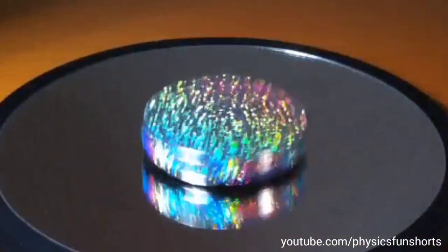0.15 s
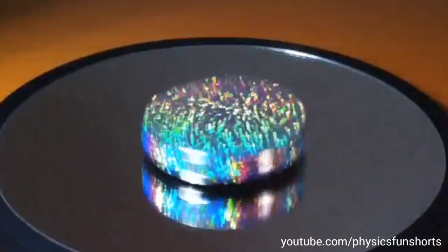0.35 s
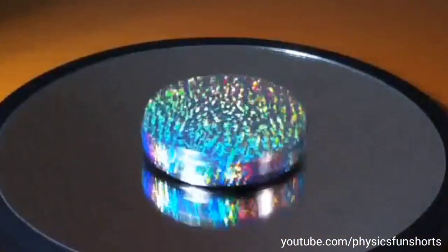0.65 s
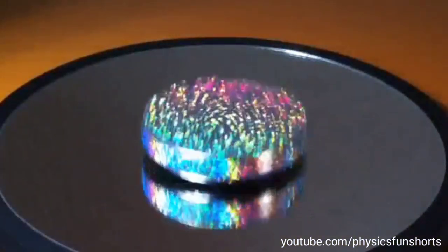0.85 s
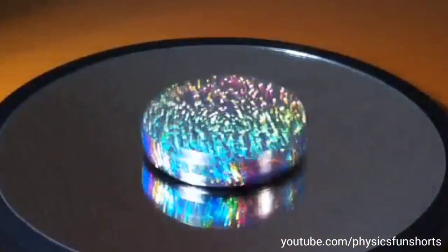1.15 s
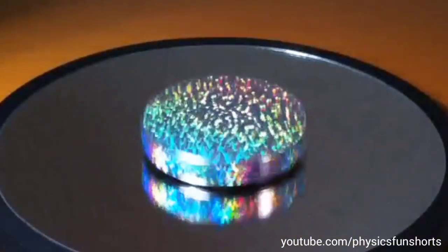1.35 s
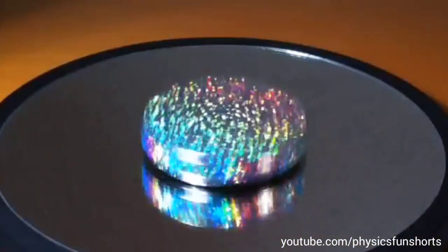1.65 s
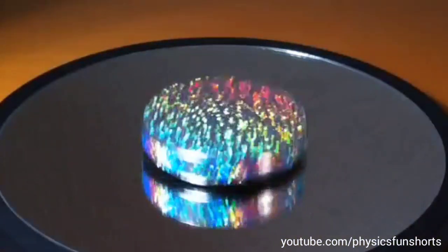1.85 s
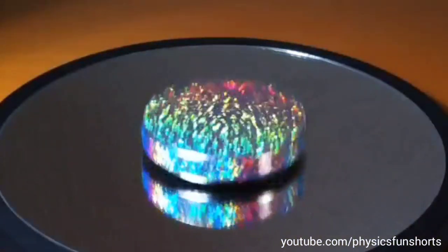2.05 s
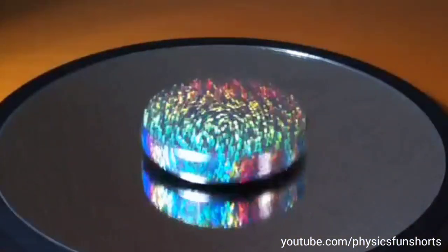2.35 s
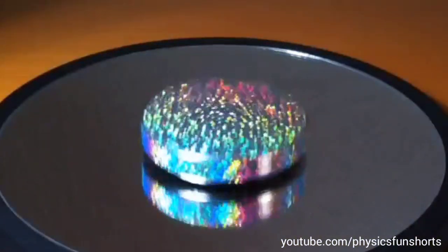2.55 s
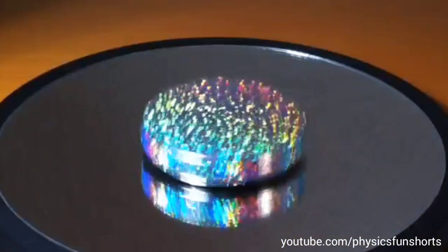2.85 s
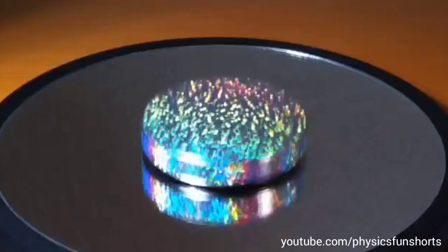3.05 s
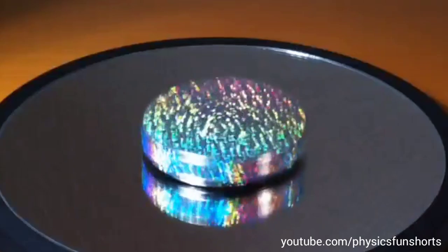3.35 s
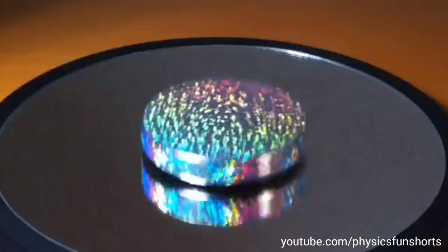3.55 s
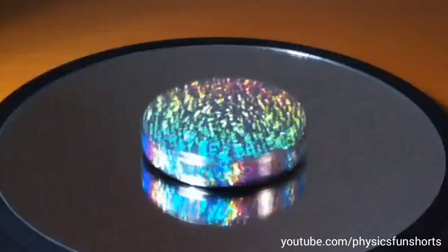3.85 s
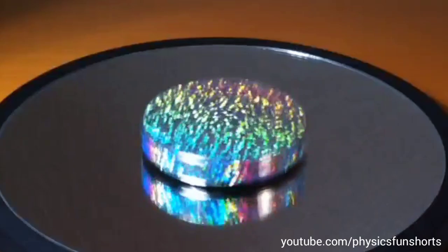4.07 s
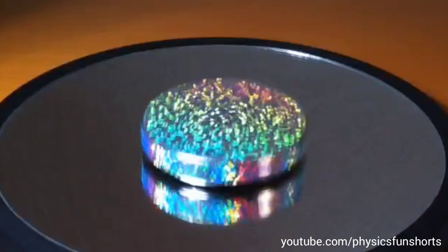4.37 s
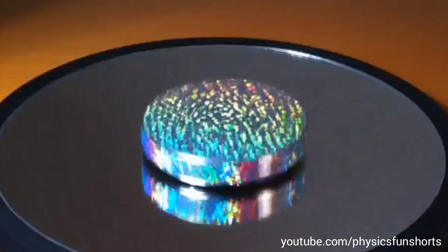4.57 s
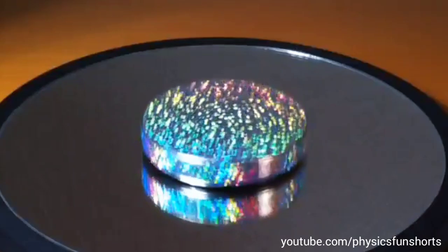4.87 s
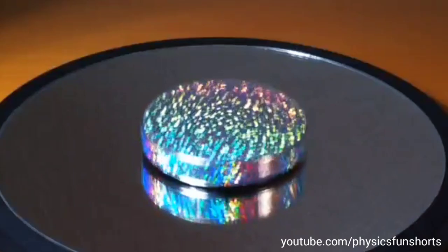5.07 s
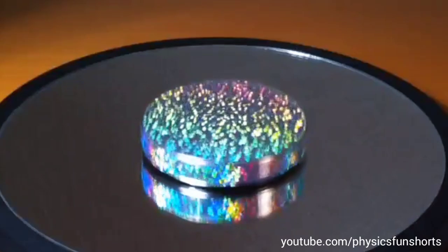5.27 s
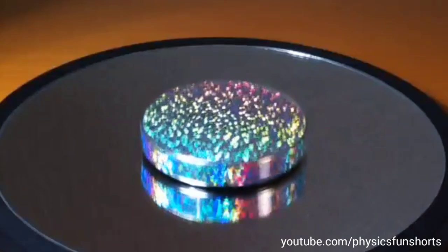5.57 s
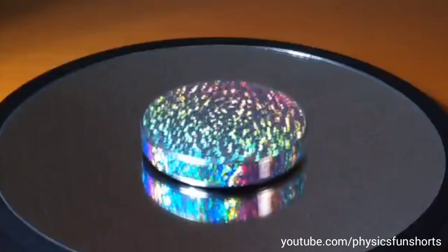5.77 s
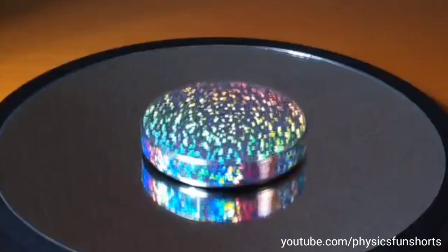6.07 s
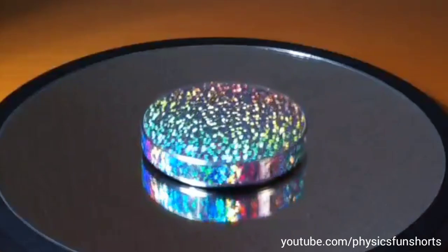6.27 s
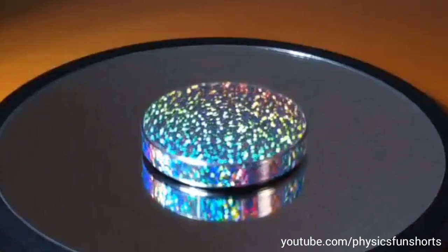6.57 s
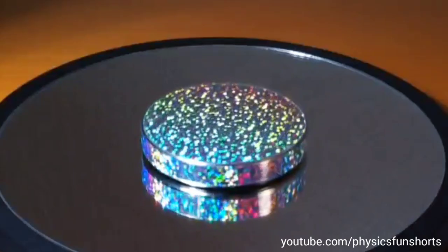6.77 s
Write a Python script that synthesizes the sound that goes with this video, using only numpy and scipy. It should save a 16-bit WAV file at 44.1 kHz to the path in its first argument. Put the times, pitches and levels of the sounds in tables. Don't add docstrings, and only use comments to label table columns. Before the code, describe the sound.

In a quiet room, very close to one microphone, a heavy steel disk is already rolling on its rim around a mirrored dish. From 0 s, short hard metallic knocks come about seventeen per second, each ringing briefly in the middle range, strongest around 1.4 to 1.9 kHz, over a continuous bright rolling hiss and ringing whir that pulses with each turn. Around 1 to 2.5 s the knocks vary in brightness and some have a quick double landing. From 3 to 5 s they quicken past twenty per second, some softer and duller. After 5 s the flutter tightens noticeably, the rolling ring grows and a faint low hum emerges. At about 6.1 s a grain crunches with a small dull puff. By 6.5 to 7 s the knocks run together at about forty per second into a buzzing metallic rattle, cut off before the disk comes to rest. Dry, with little room echo.

```python
import sys
import numpy as np
from scipy import signal
from scipy.fft import rfft, irfft, next_fast_len
from scipy.io import wavfile
from scipy.ndimage import map_coordinates

SR = 44100
rng = np.random.default_rng(int(sys.argv[2]) if len(sys.argv) > 2 else 0)


def log_audio(samples):
    frames = np.atleast_2d(samples).T
    limited = np.clip(frames, -1, 1)
    pcm = np.round(limited * 32767).astype(np.int16)
    wavfile.write(sys.argv[1], SR, pcm)


def gain_from_decibels(decibels):
    exponent = np.asarray(decibels, float) / 20
    return 10 ** exponent


N = 305083


def unit(x):
    return x / np.sqrt(np.mean(x ** 2) + 1e-20)


def curves(rows, t):
    s, *cols = np.transpose(rows)
    return np.array([np.interp(t, s, c) for c in cols])


def spells(rows, t):
    s, width, size = np.transpose(rows)[:, :, None]
    return np.exp(-((t - s) / width) ** 2), size


def swells(rows, t):
    bell, db = spells(rows, t)
    return np.sum(bell * gain_from_decibels(db), axis=0)


def wander(where, count):
    knots = rng.standard_normal((count, int(where.max()) + 4))
    return np.array([map_coordinates(k, [where + 1]) for k in knots])


def filtered(x, response):
    m = next_fast_len(N + SR // 2)
    return irfft(rfft(x, m) * response(np.fft.rfftfreq(m, 1 / SR)), m)[..., :N]


def bandpass(f, centre_hz, width_hz):
    return 1j * f * width_hz / (centre_hz ** 2 - f * f + 1j * f * width_hz)


def resonances(modes, sign=-1):
    return lambda f: sum(sign ** k * gain_from_decibels(db) * bandpass(f, c, w) for k, (c, w, db) in enumerate(modes))


def above(cut_hz):
    return lambda f: (f * f / (f * f - cut_hz ** 2 - 1.4j * f * cut_hz)) ** 2


START_S, REST_S, TURNS_TO_REST, LAW, KNOCKS = -.00433, 7.1396, 174.161, 1.38974, 161
SLIP_AT, SLIP_TURNS, SLIP_OVER = 60.2, .04726, 3
CREEP, CREEP_SLOWS, FALLS_BACK, SUDDEN = .0137765, .000036, .4054, 6.421


def motion():
    knock = np.arange(KNOCKS)
    done = knock - SLIP_TURNS * np.tanh((knock - SLIP_AT) / SLIP_OVER)
    times = START_S + REST_S * (1 - (1 - done / TURNS_TO_REST) ** LAW)
    nick = CREEP * knock - CREEP_SLOWS * knock ** 2 - FALLS_BACK * (knock / knock[-1]) ** SUDDEN
    t = np.arange(N) / SR
    return times, nick, np.interp(t, times, knock + nick), np.interp(t, times, knock)


# pitch_hz, t60_s, knock_db, swing_db (as the nick goes round the dish),
# strongest_at_turn, rolling_db
DISH = [(534.4, 0.069, -6.5, 12.5, 0.41, -10), (629, 0.069, 0.5, 5.5, 0.0061, -7.5),
        (851.3, 0.077, 2, 2.5, 0.26, -11.5), (960, 0.041, 7, 1.5, 0.28, -0.5),
        (1036, 0.056, -3.5, -0.5, 0.94, 4), (1368, 0.06, -23.5, 25, 0.788, 4.5),
        (1440.3, 0.064, 10, 0.24, 0.14, 14), (1509, 0.03, -12.5, 5, .8, 1.5),
        (1722, 0.025, -26, 21, 0.61, 1.5), (1883, 0.021, 14, 0.5, 0.066, 3.5),
        (2005, 0.067, 3.5, 2.5, 0.36, 8), (2107, 0.052, -31, 8, 0.53, 0.5),
        (2520, 0.018, -5.5, 8.5, 0.99, 2), (2787, 0.04, -12, -4, 0.51, 3), (2960, 0.021, 8, 3.5, 0.81, 7),
        (3120, 0.08, -5, -1, 0.92, 1.5)]
RISE_S = [0.0018, 0.0011, 0.0018, 0.0016, 0.0026, 0.00042, 0.00066]


def modal_rings(family, t):
    hz, t60 = np.transpose(DISH)[:2, :, None]
    rise = 1 - np.exp(-t / np.array(RISE_S)[family, None])
    return -np.sin(2 * np.pi * hz * t) * gain_from_decibels(-60 * t / t60) * rise


# start_s, half_width_s, loss_db
LOW_NODES = [
    [(.15, 0.82, 4), (1.4, 1, 9), (4.9, 0.61, 2.5), (6.4, 0.95, 27), (.9, 0.13, 1), (2.8, 0.12, 1),
     (5.5, 0.39, -3.5)],
    [(.15, 0.57, 4.5), (1.4, 1, 9.5), (4.9, 0.51, 4), (6.4, 0.85, 8.5), (1.85, 0.13, -5.5), (5.8, .2, 2),
     (6.7, 0.16, -4)],
    [(.15, 0.53, 12.5), (1.87, 0.31, 11), (1.3, .45, 2.5), (2.8, 0.64, 3.5), (4.08, 0.27, 12),
     (4.4, 0.25, 3.5), (6.15, 0.34, 8), (6.074, .015, -6), (6.45, 0.084, 14), (6.62, 0.13, 3.5),
     (6.9, 0.23, 7.5)],
]
# start_s, half_width_s, loss_db
HIGH_NODES = [
    [(1.15, 0.57, 5), (2.7, 0.39, 11), (3.45, 0.52, 18.5), (4.97, 0.54, 35), (6.15, 0.28, 8),
     (6.95, 0.12, 10), (.85, 0.12, 9), (1.85, 0.21, -2.5), (3.15, .1, -1), (3.9, 0.077, -7),
     (4.6, 0.18, -11), (5.9, 0.16, 2), (6.62, 0.07, 11), (6.8, 0.067, -2)],
    [(1.15, 0.45, 10), (2.9, .25, -6), (3.45, 0.43, 19), (4.97, 0.52, 31), (6.15, 0.26, 10),
     (6.95, 0.12, 14), (.25, .2, -2), (.65, 0.18, 4), (1.15, 0.24, -8), (1.4, 0.085, 14), (3.15, 0.071, -8),
     (4.3, 0.11, -12.5), (3.95, .15, 14), (5.7, .2, -4), (6.8, .06, 0)],
    [(.1, 0.38, 18), (.5, 0.35, 17), (2.1, 0.42, 15), (2.8, 0.94, 9), (4.4, 0.4, -7), (5.3, 0.11, -1),
     (6.3, 0.22, 8), (6.78, .1, 3)],
    [(.05, 0.38, 10), (.5, 0.39, 20), (1.25, 0.32, 12), (1.85, 0.28, 18), (3.12, 0.16, 5.5),
     (3.95, 0.22, 8.5), (4.55, 0.24, 5.5), (5, 0.33, 3.5), (5.8, .2, 3.5), (6.5, 0.45, 18), (2.5, .3, 3),
     (3.5, 0.22, 0)],
]


def node_loss(times):
    return np.array([np.sum(np.multiply(*spells(rows, times)), axis=0) for rows in LOW_NODES + HIGH_NODES])


FAMILY_DB = [-42, -42.5, -28.5, -35.5, -37.5, -41, -39]
# start_s, change_db
ODD_KNOCKS = [(.28, 0.5), (.51, 1.5), (.56, 1), (.67, 0), (.78, 0.5), (.95, 1), (4.45, -0.5), (4.91, -0.5),
              (4.99, -1.5), (5.03, 2), (5.08, 0), (5.16, 0), (5.47, -2), (5.54, -0.5), (5.58, -3),
              (5.62, 0), (5.73, 0), (5.8, -5), (5.83, 0.5), (5.94, 2.5), (6.01, 0), (6.11, -0.5),
              (6.14, -3.5), (6.2, 3.5), (6.24, 1), (6.27, -2), (6.3, -3), (6.33, -1), (6.36, 1.5),
              (6.39, -0.5), (6.45, -4), (6.48, -2), (6.51, 1), (6.54, 3), (6.59, 1), (6.68, 1), (6.73, 2),
              (6.75, 2.5), (6.85, -1), (6.87, -2)]


def knock_levels(times, nick, family, loss_db, strength):
    _, _, knock_db, swing_db, best, _ = np.transpose(DISH)[:, :, None]
    family_db = np.array(FAMILY_DB)[:, None] - loss_db
    place_db = swing_db * np.cos(2 * np.pi * (nick - best))
    scatter_db = 0.49 * rng.standard_normal((len(times), len(DISH))).T
    scatter_db += (0.75 - 0.2 * (times * SR / N) ** 6) * strength
    odd_s, odd_db = np.transpose(ODD_KNOCKS)
    nearest = np.abs(times - odd_s[:, None]).argmin(axis=1)
    scatter_db[:, nearest] += odd_db
    return gain_from_decibels(family_db[family] + knock_db + place_db + scatter_db)


# start_s, half_width_s, level_db (re the knock), delay_ms
BOUNCE = [(0, .5, -23, 8.2), (1.2, 0.24, -11.5, 8.2), (1.7, 0.21, -6.5, 10.7), (2.1, 0.18, -5.5, 6.1),
          (3, 0.32, -30, 9.8), (4.0, .2, -5, 9.8), (4.4, 0.23, -5, 7.7), (5.4, 0.65, -13.5, 9.6),
          (6.2, 0.23, -7, 9), (6.45, 0.14, -2, 10.4), (6.65, .08, -7, 8.3), (6.79, 0.059, -0.5, 9.4),
          (6.9, 0.047, -5, 9.2)]
BOUNCE_FAMILY_DB = [-10, -6.5, 1.5, -7, -2.5, 4.5, -2]


def second_landing(times, family, rebound, late):
    *spell, delay_ms = np.transpose(BOUNCE)
    bell, bounce_db = spells(np.transpose(spell), times)
    gain = bell * gain_from_decibels(bounce_db)
    family_db = np.array(BOUNCE_FAMILY_DB)[family, None]
    again = np.sum(gain, axis=0) * gain_from_decibels(family_db + 1.2 * rebound)
    again[family == family.max()] = gain_from_decibels(-6)
    delay_s = delay_ms[gain.argmax(axis=0)] / 1000 + .00006 * late
    return again, np.round(delay_s * SR).astype(int)


# pitch_hz, width_hz, level_db, change_db (as the disk lies flatter)
DISK = [(3540, 200, -14, 28), (4408, 203, 2.5, -2.5), (5405, 307, 3, -5.5), (5820, 250, 1.5, -3.5),
        (6500, 580, -2.5, 4), (8380, 2070, -6.5, 0.5), (9740, 770, -3, 1.5), (11580, 370, -11.5, 4.5),
        (12100, 560, -20.5, -4), (13420, 340, -14.5, 1.5)]


def disk(x):
    early, late = ([(hz, w, db + side * change) for hz, w, db, change in DISK] for side in (-.5, .5))
    flat = np.arange(N) / N
    return (1 - flat) * filtered(x, resonances(early)) + flat * filtered(x, resonances(late))


FAMILY_EDGES_HZ = [760, 1200, 1600, 1930, 2300, 2650]
# start_s, main_build_ms, extra_decay_db_per_ms, tick_db
BLUNT = [(0, 0.75, -1.8, -27), (.5, 1.27, -0.05, -26.5), (1, 1.42, -1, -32), (1.5, 1.14, -1, -30),
         (1.9, 1.32, -0.4, -43), (2.3, 1.29, -0.2, -36), (2.8, 0.62, 0.36, -23), (3.4, 0.75, -0.2, -25),
         (3.8, 1.23, 0, -27), (4.1, 1.17, -0.3, -26), (4.5, 1.16, 0, -27.5), (4.9, 1.72, 0.3, -29),
         (5.3, 1.58, -0.1, -25.5), (5.7, 1.24, 0.55, -27), (6.2, 0.8, 0, -30), (6.45, 0.86, 0, -29),
         (6.6, 0.92, -0.15, -28), (6.75, 0.94, 0, -27), (6.9, 1.05, 1, -31)]
# start_s, half_width_s, level_db (re the knock)
LEAD_IN = [
    (3.7, 0.27, -10),
    (4.15, 0.32, -6),
    (4.5, 2.8, -35),
]
LEAD_S = .0108


def knocks(times, nick):
    out, ticks = np.zeros(N + SR), np.zeros(N + SR)
    t = np.arange(SR // 14) / SR
    ms = t * 1000
    lateness = times * SR / N
    family = np.searchsorted(FAMILY_EDGES_HZ, [row[0] for row in DISH])
    rings = modal_rings(family, t)
    loss_db = node_loss(times)
    strength, damping, blunt, late, rebound = rng.standard_normal((len(times), 5)).T
    level = knock_levels(times, nick, family, loss_db, strength)

    build_ms, decay, tick_db = curves(BLUNT, times)
    sooner = np.abs(0.33 + decay + .1 * damping + 0.04 * loss_db[2] + 0.89 * lateness ** 12)
    fading = gain_from_decibels(sooner[:, None] * (3.5 - ms))
    heads = np.round(0.54 * np.abs(build_ms) * SR / 1000).astype(int)
    build_ms = np.abs(build_ms) * gain_from_decibels(1.22 * blunt)
    soft = 1 - np.exp(-(ms / build_ms[:, None]) ** 2)
    upper_build_ms = 0.27 + 1.8 * lateness ** 9
    slow = 1 - np.exp(-(ms / upper_build_ms[:, None]) ** 2)

    low, main, top = family < 2, family == 2, family > 4
    upper = (family == 3) | (family == 4)

    def sounded(gain, modes):
        return gain[modes].T @ rings[modes]

    def blow(gain):
        return sounded(gain, low) + (sounded(gain, top) + sounded(gain, upper) * slow) * fading

    def ping(gain):
        return sounded(gain, main) * soft * fading

    again, lags = second_landing(times, family, rebound, late)
    firsts, pings = blow(level), ping(level)
    seconds = blow(level * again) + ping(level * again)
    tick = rng.standard_normal((len(times), len(t))) * gain_from_decibels(-60 * t / 0.033)
    tick -= 1.3 * (1 - t / .00007) * np.exp(-t / .00007)
    cracks = tick * gain_from_decibels(tick_db)[:, None]
    for k, s in enumerate(times):
        i = max(round(s * SR), 0)
        out[i:i + len(t)] += firsts[k]
        out[max(i - heads[k], 0):][:len(t)] += pings[k]
        out[i + lags[k]:i + lags[k] + len(t)] += seconds[k]
        ticks[i:i + len(t)] += cracks[k]
    lead = round(LEAD_S * SR)
    early = out[lead:N + lead] * swells(LEAD_IN, np.arange(N) / SR)
    return filtered(out[:N] + early, above(cut_hz=354)) + disk(ticks[:N])


# pitch_hz, once_a_turn_db, once_at_turn, twice_a_turn_db, twice_at_turn
SWELL = [(1500, 3, 0.022, 0, 0.036), (4380, 2.5, 0.66, 0, 0.55), (5270, 1.5, 0.7, -0.5, 0.24),
         (7250, 1.5, 0.66, 1.2, 0.22), (10600, 1.1, 0.47, 0.5, 0.17)]


def rough(place, patchy_db, grainy_db):
    hz, t, z = signal.stft(rng.standard_normal(N), SR, nperseg=128)
    turn = np.interp(t, np.arange(N) / SR, place)
    band, once_db, once_at, twice_db, twice_at = np.transpose(SWELL)[:, :, None]
    swell_db = once_db * np.cos(2 * np.pi * (turn - once_at))
    swell_db = swell_db + twice_db * np.cos(2 * np.pi * 2 * (turn - twice_at))
    share = np.transpose([np.interp(hz, band[:, 0], one) for one in np.eye(len(SWELL))])
    spots = rng.standard_normal((16, 12, 24))
    grid = np.broadcast_arrays(hz[:, None] / 1400, 12 * (turn % 1), turn / 8)
    patch_db = patchy_db * map_coordinates(spots, grid, order=1, mode="grid-wrap")
    grain_db = grainy_db * wander(t * 180, count=1)
    return signal.istft(z * gain_from_decibels(share @ swell_db + patch_db + grain_db), SR, nperseg=128)[1][:N]


def track(rim):
    bumps = rng.standard_normal((24, 2048))
    return unit(map_coordinates(bumps, [rim / 16, 2048 * (rim % 1)], order=1, mode="grid-wrap"))


def machined(x, rim):
    hz, t, z = signal.stft(x, SR, nperseg=512)
    turn = np.interp(t, np.arange(N) / SR, rim)
    rate = np.maximum(np.gradient(turn, t), 10)
    marks = rng.standard_normal((128, 12))
    grid = np.broadcast_arrays(hz[:, None] / rate / 11, turn / 20)
    depth_db = 2.2 * map_coordinates(marks, grid, order=1, mode="grid-wrap")
    return signal.istft(z * gain_from_decibels(depth_db), SR, nperseg=512)[1][:N]


# start_s, level_db
ROLL = [(0, -40), (2.5, -41.5), (3.8, -37), (5.8, -33.5), (6.45, -36.5), (6.78, -31), (6.92, -32.5)]
# start_s, main_mode, frame_modes, upper_mode, top_mode
HELD = [(0, 0.35, 0.33, -0.36, 0.15), (.6, 0.29, 0.4, -1.1, 0.1), (1.2, 0.41, 0.53, -0.26, 0.018),
        (1.85, 0.36, 0.45, -.9, 0.17), (2.3, 0.23, 0.17, -0.48, 0.3), (2.9, 0.23, 0.24, -0.26, 0.12),
        (3.5, -0.11, 0.3, 0.08, -0.2), (4.15, -0.6, 0.13, 0.97, 0), (4.8, 0.44, 0.13, 0.65, 0),
        (5.4, .3, 0.34, .5, .2), (5.9, 0.17, 0.67, 0.41, 0.57), (6.25, 0.46, 0.54, 0.15, 0.018),
        (6.47, 0.74, 0.64, -0.23, .5), (6.62, 0.3, 0.6, -0.42, 0.62), (6.8, 0.067, 0.95, -0.3, .5),
        (6.9, 0.19, 0.92, -0.051, 0.4)]


def rolling_ring(contact, rim):
    dish = resonances([(hz, np.log(1000) / np.pi / t60, db) for hz, t60, *_, db in DISH], sign=0.94)
    repeated = .62
    force = np.sqrt(repeated) * track(rim) + np.sqrt(1 - repeated) * unit(contact)
    ring = unit(filtered(force, lambda f: dish(f) * above(cut_hz=480)(f) / (1 + (f / 3600) ** 4)))
    held_modes = [(1404, 65, 0), (936, 530, 0), (2025, 170, 0), (2800, 450, 0)]  # Hz, width Hz, dB
    for share, mode in zip(curves(HELD, np.arange(N) / SR), held_modes):
        ring = ring - np.clip(share, -1, 1) * filtered(ring, resonances([mode]))
    return ring


# pitch_hz, level_db_per_hz
BETWEEN = [(25, -68), (70, -24), (115, -13.5), (220, -18.5), (460, -19.5), (720, -30), (1100, -8),
           (1600, -5.5), (2400, -7), (3700, -15.5), (6000, -4), (10300, -12.5), (12000, -15), (15000, -30)]
# start_s, level_db
RUMBLE = [(0, 0), (1.2, 0.5), (1.7, -1.5), (2.1, 0.5), (3.5, -3), (4, -0.5), (5.7, 0.5), (6.9, 5)]


def rolling_broad(place, rim):
    pitch_hz, level_db = np.transpose(BETWEEN)

    def broad(f):
        return gain_from_decibels(np.interp(np.log(f + 1), np.log(pitch_hz), level_db))

    def returns(f):
        return .75 / (1 + (f / 1400) ** 4)

    both = np.array([machined(rough(place, patchy_db=4.0, grainy_db=0.7), rim), 0.46 * track(rim)])
    shaped = filtered(both, lambda f: broad(f) * np.sqrt([1 - returns(f), returns(f)]))
    noise = unit(shaped.sum(axis=0))
    bass = filtered(noise, lambda f: 1 / (1 + (f / 600) ** 6))
    drift_db = np.minimum(6.0 * wander(place * 1.2, count=1)[0], 3)
    bass_db = drift_db + curves(RUMBLE, np.arange(N) / SR)[0] + 0.8
    return noise + bass * (gain_from_decibels(bass_db) - 1)


def rolling(place, rim):
    t = np.arange(N) / SR
    dish_db, = curves(ROLL, t)
    disk_db = -39 - 0.1138 * t
    contact = rough(place, patchy_db=3.5, grainy_db=0.75)
    ring = rolling_ring(contact, rim)
    grain = machined(unit(contact) + 0.44 * track(rim), rim)
    hiss = unit(disk(filtered(grain, above(cut_hz=3450))))
    noise = rolling_broad(place, rim)
    return gain_from_decibels(dish_db - 4.0) * ring + gain_from_decibels(disk_db - 1.5) * hiss + gain_from_decibels(disk_db - 4.5) * noise


# start_s, half_width_s, level_db
HUM = [
    [(6.25, 0.17, -68), (6.78, 0.2, -55.5)],
    [(5.95, 0.44, -73), (6.39, 0.15, -65), (6.76, 0.13, -65.5)],
    [(3.95, 0.38, -68.5), (5.3, 0.84, -67), (6.21, 0.21, -61), (6.74, 0.12, -69)],
    [(1.3, 0.98, -76), (2.8, 0.83, -77), (3.95, 0.81, -72.5), (5.35, 0.4, -69.5), (6.4, 0.11, -74),
     (6.77, 0.15, -68)],
]
# start_s, level_db
RIPPLE = [(0, -88), (3, -80), (5, -73), (6.45, -72), (6.75, -65.5), (6.9, -60.5)]
# pitch_hz, width_hz, level_db
FRAME = [(130, 55, 0), (244, 24, 1), (349, 44, 1.5), (421, 38, 4.5), (556, 230, -5)]


def hum(place):
    t = np.arange(N) / SR
    strong = gain_from_decibels(5.5) * np.array([swells(rows, t) for rows in HUM])
    drift = np.repeat(wander(place[::64] / 6, count=16), 64, axis=1)[:, :N]
    fine = gain_from_decibels(curves(RIPPLE, t) + 4.7 * drift)
    multiple = np.arange(3, 23)[:, None]
    start = rng.uniform(0, 1, multiple.shape)
    waves = np.sin(2 * np.pi * (multiple * place + start))
    low = len(strong)
    shaken = filtered(np.sum(fine * waves[low:], axis=0), resonances(FRAME))
    return np.sum(strong * waves[:low], axis=0) + shaken


# start_s, peak_db
GRIT = [
    (6.071, -34.5),
]


def grit():
    out, t = np.zeros(N), np.arange(SR // 10) / SR
    for s, db in GRIT:
        envelope = gain_from_decibels(db + 6 - 60 * t / .07) * (1 - np.exp(-t / .002))
        out[round(s * SR):][:len(t)] = envelope * rng.standard_normal(len(t))
    return filtered(out, resonances([(110, 66, -1), (560, 160, 7), (850, 180, 4), (2000, 1200, -1)]))


def scene():
    times, nick, place, rim = motion()
    return (knocks(times, nick) + rolling(place, rim) + hum(place) + grit())[None]


# pitch_hz, width_hz, share_removed
GAPS = [(474.5, 53, 0.85), (734, 74, 0.85), (1179, 14, 1), (2624, 105, 0.57), (3560, 370, 0.29)]


def cancelled(f):
    return np.prod([1 - np.clip(share, 0, 1) * bandpass(f, c, w) for c, w, share in GAPS], axis=0)


def roll_off(x):
    return signal.sosfilt(signal.butter(12, 15220, fs=SR, output="sos"), x)


def record(dry):
    mix = filtered(dry, cancelled)
    return roll_off(mix)


dry = scene()
out = record(dry)
log_audio(out)
```